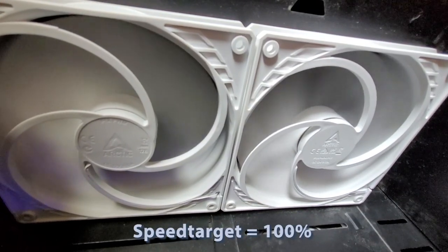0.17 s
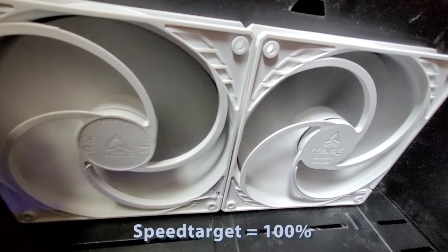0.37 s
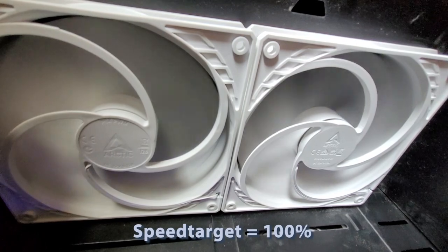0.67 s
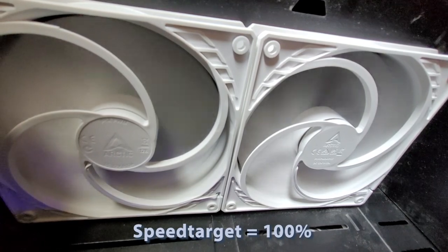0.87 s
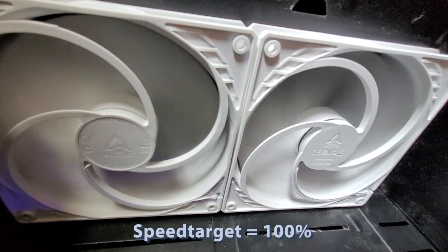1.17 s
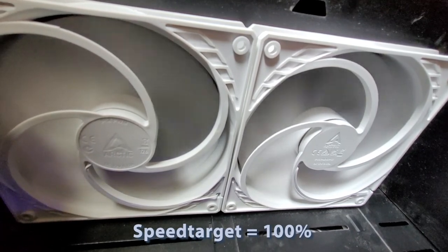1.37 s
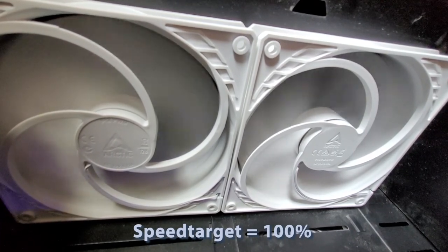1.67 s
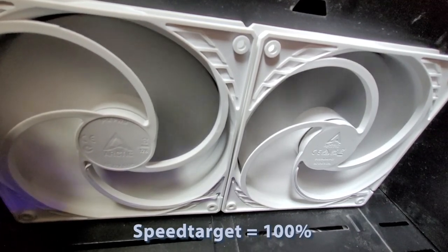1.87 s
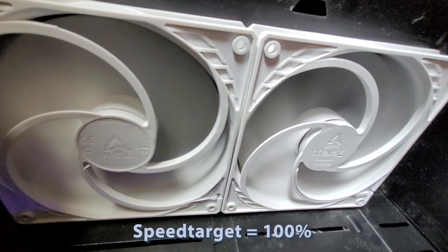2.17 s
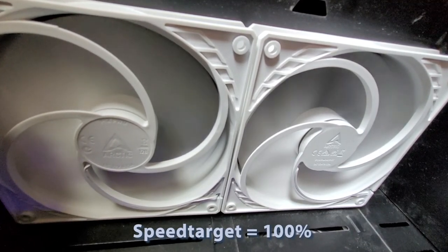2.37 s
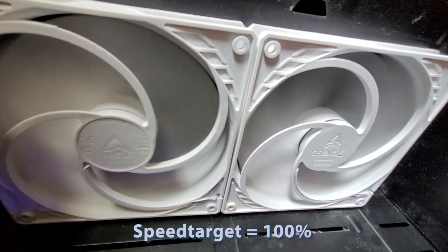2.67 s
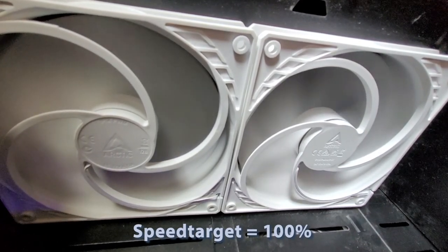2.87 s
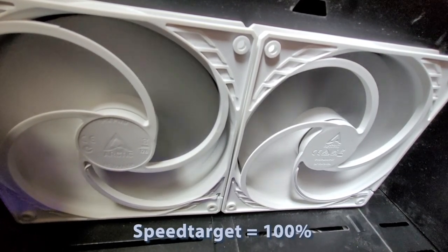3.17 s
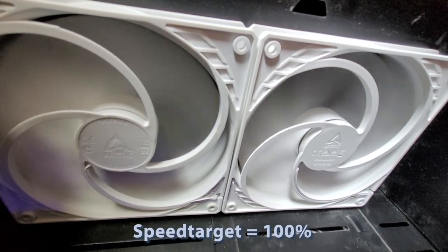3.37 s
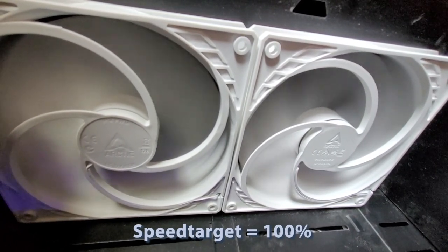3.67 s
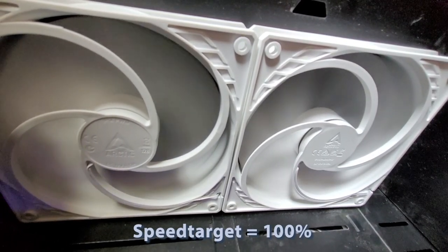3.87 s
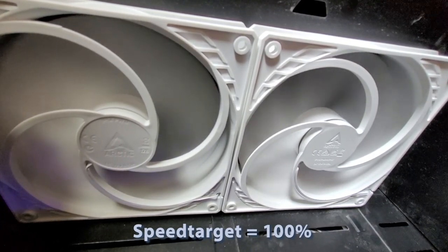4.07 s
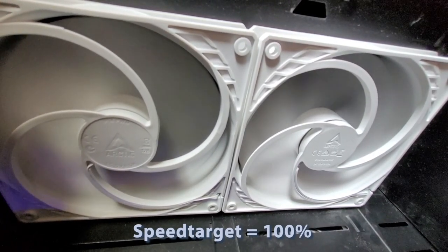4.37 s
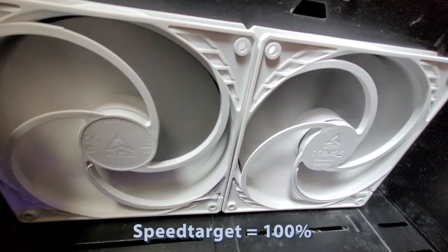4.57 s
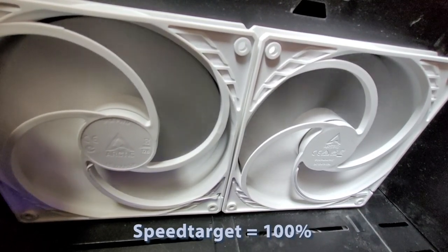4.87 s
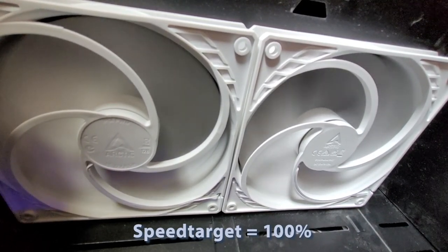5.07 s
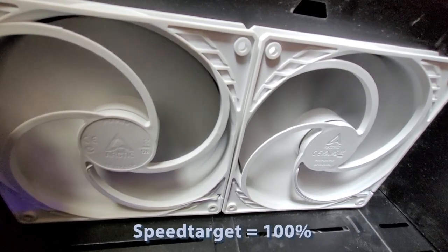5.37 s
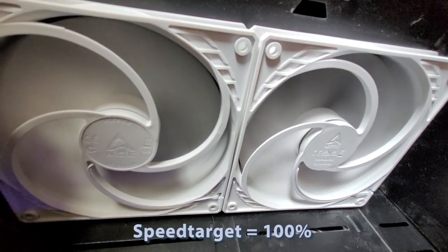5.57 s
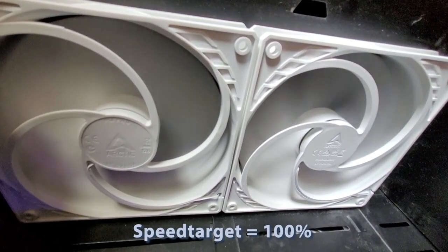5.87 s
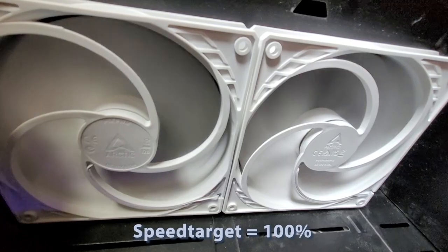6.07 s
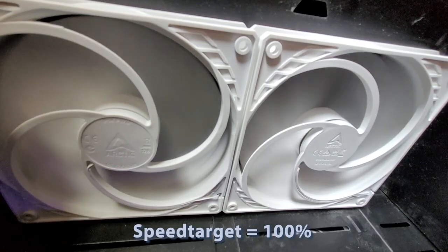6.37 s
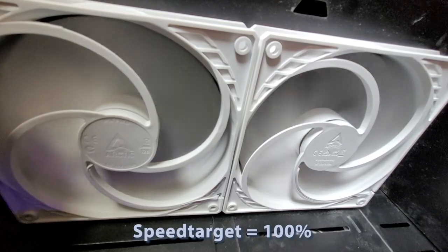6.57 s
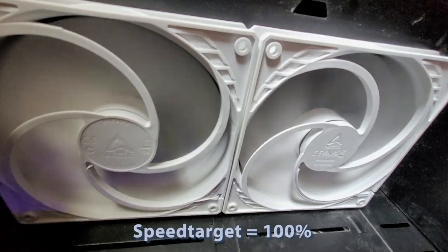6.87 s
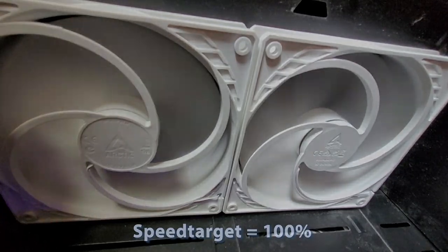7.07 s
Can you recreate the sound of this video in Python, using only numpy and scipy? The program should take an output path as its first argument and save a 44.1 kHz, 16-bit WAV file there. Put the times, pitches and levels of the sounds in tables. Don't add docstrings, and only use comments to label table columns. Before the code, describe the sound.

Two fans spin flat out very close to a stereo microphone. Low wind rumble dominates, steady and softer on the right, gusty on the left, where irregular dull thumps and flaps burst in the airflow. Beneath it runs a constant low hum with a faint higher whine and a soft, hollow rush of air ringing inside a computer case.

```python
import sys
import numpy as np
from scipy import signal
from scipy.fft import irfft
from scipy.io import wavfile
from scipy.ndimage import uniform_filter1d, minimum_filter1d

SR = 44100
rng = np.random.default_rng(int(sys.argv[2]) if len(sys.argv) > 2 else 0)


def elevation(decibels):
    levels = np.asarray(decibels, float)
    return 10 ** (levels / 20)


def master(y):
    cut = np.clip(np.atleast_2d(y).T, -1, 1)
    pcm = np.round(cut * 32767)
    wavfile.write(sys.argv[1], SR, pcm.astype(np.int16))


N = 317520
HZ = np.fft.rfftfreq(N, 1 / SR)
TIME = np.arange(N) / SR
SHAFT_A_HZ, SHAFT_B_HZ = 26.919, 27.462

# start_s, rumble_db
LEFT_GUSTS = [(0.0, -34), (0.15, -22.5), (0.45, -29), (1.0, -26.5), (1.3, -30), (1.6, -27), (2.25, -25.5),
              (2.55, -28), (2.9, -24.5), (3.2, -23.5), (3.75, -29.5), (4.6, -28), (4.8, -24.5), (5.25, -25),
              (5.8, -30), (6.15, -26), (6.9, -26), (7.2, -28)]
# centre_s, peak_db, pitch_hz, length_ms
BIG_EDDIES = [(0.168, -7, 117, 16), (0.244, -6.5, 80, 30), (0.312, -10, 90, 27), (0.856, -13.5, 83, 32),
              (1.116, -12, 86, 20), (1.504, -8, 103.6, 22), (1.674, -7, 68, 41), (1.829, -8, 131, 21),
              (2.102, -8.5, 81, 19), (2.234, -2.5, 87.5, 13), (2.421, -8.5, 124, 21), (2.785, -9, 104, 16),
              (2.83, -7.5, 95, 29), (2.989, 0.5, 87.5, 9.1), (3.037, -5, 84, 17), (3.673, -10, 109, 16),
              (4.305, -7, 86.5, 17), (4.39, -8.5, 80, 28), (4.665, -10, 79.6, 25), (4.842, -8, 86, 16),
              (4.905, -5.5, 124, 19), (5.034, -6.5, 67, 35), (5.142, -7, 72, 34), (5.267, -9, 85.4, 40),
              (5.63, -7, 84, 53), (6.095, -2.5, 91, 12), (6.176, -4.5, 87, 15.5), (6.401, -3.5, 72, 15),
              (6.682, -1.5, 108, 17.5), (7.181, -7.5, 57.6, 32)]
# centre_s, peak_db
SMALL_EDDIES = [(0.107, -13.5), (0.133, -11.5), (0.311, -8), (1.503, -15.5), (1.586, -12), (1.664, -13),
                (1.829, -9.5), (1.895, -9), (2.809, -10), (2.943, -16), (2.976, -12), (3.018, -15.5),
                (3.686, -19.5), (4.382, -13.5), (4.677, -18), (4.843, -10), (4.897, -14.5), (5.031, -13),
                (5.137, -18.5), (5.201, -21.5), (5.245, -20), (5.306, -13.5), (5.62, -13), (6.063, -19),
                (6.09, -16.5), (6.174, -13.5), (6.58, -20), (6.656, -5.5), (6.701, -15), (7.168, -18.5)]


def walk(rate_hz):
    hold = int(SR / rate_hz)
    steps = np.repeat(rng.standard_normal(N // hold + 1), hold)
    return 1.51 * uniform_filter1d(uniform_filter1d(steps, hold), hold)[:N]


def noise():
    return np.sqrt(N * SR / 4) * (rng.standard_normal(len(HZ)) + 1j * rng.standard_normal(len(HZ)))


def colour(table):
    hz, *ports_db = np.transpose(table)
    gain = elevation([np.interp(np.log(HZ + 1), np.log(hz), db) for db in ports_db])
    return gain * np.minimum(HZ / hz[0], 1) ** 2


def octave_share(centre_hz):
    return np.cos(np.pi / 2 * np.clip(np.log2((HZ + 1) / centre_hz), -1, 1))


def curves(table):
    s, *columns = np.transpose(table)
    return [np.interp(TIME, s, column) for column in columns]


def stirred(table, width_s):
    calm = np.ones(N)
    for s in np.transpose(table)[0]:
        near = slice(max(int((s - 3 * width_s) * SR), 0), int((s + 3 * width_s) * SR))
        calm[near] *= 1 - np.exp(-((TIME[near] - s) / width_s) ** 2)
    return 1 - calm


def draught(flicker_db, surge_db, tilt):
    # hz, left_db_per_hz, right_db_per_hz
    swirl_levels = [(14, -28, -30), (25, -17, -21), (46, -3, -4), (66, 0, 0), (92, -7, -5), (145, -6, -4),
                    (180, -14, -15), (250, -13, -11), (300, -19, -17), (350, -23, -23), (435, -23, -27),
                    (455, -30, -31), (700, -45, -45)]
    right_rumble_db, right_flutter_db, lee_share = -28.5, -29.5, .15
    gust_db = curves(LEFT_GUSTS)[0]
    change_db = gust_db - gust_db.mean()
    spectrum = colour(swirl_levels) * [noise(), noise()]
    spectrum /= irfft(spectrum, N).std(axis=1, keepdims=True)
    left_low_db = gust_db + surge_db[0] * stirred(BIG_EDDIES, width_s=.043)
    left_high_db = gust_db + tilt * change_db + surge_db[1] * stirred(SMALL_EDDIES, width_s=.025)
    low_db = np.array([left_low_db, right_rumble_db + lee_share * change_db])
    high_db = np.array([left_high_db, right_flutter_db + 0 * TIME])
    out = 0
    for octave in range(6):
        flicker = np.array(flicker_db)[:, None] * [walk(22), walk(26)]
        level_db = high_db if octave > 2 else low_db
        out = out + irfft(spectrum * octave_share(16 * 2 ** octave), N) * elevation(level_db + flicker)
    return out


def family(times, db, hz, ms, spread):
    chance = rng.standard_normal((len(times), 2))
    pitch_hz = hz * (1 + spread * chance[:, 0])
    length_ms = ms * np.exp(2 * spread * chance[:, 1])
    return np.transpose([times, db, pitch_hz, length_ms])


def stray(count, over_db, scatter_db):
    chance = rng.uniform(0, 1, (count, 2))
    times = (np.arange(count) + chance[:, 0]) / count * TIME[-1]
    gust_db = np.interp(times, *np.transpose(LEFT_GUSTS))
    return times, gust_db + over_db - scatter_db * chance[:, 1]


def eddies(table, glide, rise, fall, over, over_db, trim_db):
    lead_in = SR // 2
    out = np.zeros(N + SR)
    chance = rng.uniform(0, 2 * np.pi, (len(table), 3))
    t = np.arange(-SR // 10, SR // 10) / SR
    for (s, db, hz, ms), (phase, top_phase, skew) in zip(table, chance):
        u = t / (np.where(t < 0, rise, fall) * ms / 1000)
        bell = np.exp(-np.log(16) * u ** 2)
        cycles = hz * t * (1 - glide * np.clip(u, -1.5, 1.5) / 2)
        top_ratio = over * (1 + .14 * np.sin(skew))
        top = elevation(over_db) * bell * np.cos(2 * np.pi * top_ratio * cycles + top_phase)
        start = int(s * SR) + lead_in - SR // 10
        out[start:start + len(t)] += elevation(db + trim_db) * bell * (np.cos(2 * np.pi * cycles + phase) + top)
    return out[lead_in:lead_in + N]


def buffets():
    big_s, big_db = np.transpose(BIG_EDDIES)[:2]
    small_s, small_db = np.transpose(SMALL_EDDIES)
    stray_big = family(*stray(count=30, over_db=14.5, scatter_db=13.5), hz=85.5, ms=25, spread=.13)
    big = np.vstack([BIG_EDDIES, stray_big])
    wake = family(big_s + .0056, big_db - 10.5, hz=53, ms=26, spread=.11)
    stray_small = family(*stray(count=32, over_db=3, scatter_db=11), hz=235, ms=12, spread=.1)
    small = np.vstack([family(small_s, small_db, hz=233.8, ms=12.9, spread=.06), stray_small])
    tiny = family(small_s - .002, small_db - 13.5, hz=399, ms=12, spread=.058)
    out = eddies(wake, glide=.33, rise=.9, fall=1.1, over=1.5, over_db=-8, trim_db=-2.5)
    out += eddies(big, glide=.64, rise=.93, fall=1, over=1.67, over_db=-10.5, trim_db=-.76)
    out += eddies(small, glide=.29, rise=.9, fall=.67, over=1.4, over_db=-15, trim_db=1.44)
    out += eddies(tiny, glide=.17, rise=.83, fall=.92, over=1.346, over_db=-7, trim_db=-3)
    return out


def whistle():
    # centre_s, length_s, pitch_hz, width_hz, left_db, right_db
    whistle_settings = (1.82, .11, 8500, 1100, -69, -74)
    s, length_s, hz, width_hz, *ports_db = whistle_settings
    band = np.exp(-2 * ((HZ - hz) / width_hz) ** 2)
    hiss = irfft(band * [noise(), noise()], N) / np.sqrt(width_hz)
    return hiss * elevation(np.array(ports_db))[:, None] * np.exp(-2 * ((TIME - s) / length_s) ** 2)


def case(shared):
    # centre_hz, width_hz, left_db, right_db, left_lead_rad
    air_spaces = [(730, 75, -57, -50, 3.0), (850, 120, -55, -58, .4), (965, 75, -53.5, -49.5, .4),
                  (1090, 60, -57, -53.5, 1.5), (1240, 125, -51.5, -43.5, .6), (1375, 70, -59, -51, -2.6),
                  (1545, 140, -56, -52, 1.8), (1920, 150, -58, -58, .2), (2090, 170, -57, -60, .1),
                  (3050, 200, -64, -64, -2.0), (3450, 250, -68, -64, -2.5), (3950, 250, -70, -69, 2.8),
                  (4750, 200, -75, -67, 2.8), (5050, 250, -67, -69, 2.8), (6500, 500, -74, -71, 3.0),
                  (7250, 400, -82, -71, 3.0), (7850, 350, -74, -79, 3.0), (15450, 400, -90, -90, .1)]
    out, shared = 0, np.clip(shared, 0, 1)
    for hz, width_hz, left_db, right_db, lead_rad in air_spaces:
        shape = 1 / (1 + (2 * (HZ - hz) / width_hz) ** 2) / np.sqrt(np.pi / 4 * width_hz)
        right = noise()
        left = np.sqrt(shared) * np.exp(1j * lead_rad) * right + np.sqrt(1 - shared) * noise()
        out = out + shape * [elevation(left_db) * left, elevation(right_db) * right]
    return irfft(out, N)


def rush(flicker_db, throb):
    # hz, left_db_per_hz, right_db_per_hz
    rush_levels = [(450, -75, -74), (880, -78.5, -74), (1110, -74.5, -72.5), (1370, -80.5, -80),
                   (1774, -82, -75.5), (2170, -86.5, -91), (2860, -91, -92), (4100, -93, -89.5),
                   (5360, -97, -94.5), (6440, -102, -100), (8080, -102, -100), (8370, -111, -111),
                   (10400, -114, -113), (14900, -118, -118)]
    spectrum = colour(rush_levels) * [noise(), noise()]
    turn = np.sin(2 * np.pi * SHAFT_B_HZ * TIME)
    out = 0
    for octave in range(8):
        band = irfft(spectrum * octave_share(125 * 2 ** octave), N) * elevation(flicker_db * walk(16))
        out = out + band * (1 + throb * (octave > 4) * turn)
    return out


def air():
    # start_s, flow_db
    flow = [
        (0.0, -0.3),
        (1.2, -0.54),
        (1.8, 0.5),
        (3.9, -0.64),
        (4.7, 0.8),
        (5.7, -0.56),
        (6.8, -0.5),
        (7.2, -3.5),
    ]
    return (rush(flicker_db=.35, throb=.08) + case(shared=.94)) * elevation(curves(flow)[0])


def tones(shaft_hz, table, wobble_hz, swell_db, lag_s):
    turns = np.cumsum(shaft_hz + wobble_hz * walk(1.517)) / SR
    out = 0
    for k, *ports_db in table:
        port_phase = 2 * np.pi * k * shaft_hz * np.array([[lag_s], [0]])
        phase = rng.uniform(0, 2 * np.pi) + port_phase
        level = np.sqrt(2) * elevation(np.array(ports_db)[:, None] + swell_db * walk(5.9))
        out = out + level * np.sin(2 * np.pi * k * turns + phase)
    return out


def blade_tone(left_db, flicker_db):
    # start_s, right_db
    swell = [
        (0.0, -37),
        (0.6, -39.5),
        (1.0, -38.5),
        (2.4, -33),
        (3.6, -37.5),
        (4.2, -35),
        (4.9, -40.5),
        (5.8, -42),
        (6.6, -36.5),
        (7.2, -36.5),
    ]
    db = curves(swell)[0] + np.array([[left_db], [0]]) + flicker_db * walk(19)
    return np.sqrt(2) * elevation(db) * np.sin(2 * np.pi * 5 * SHAFT_A_HZ * TIME)


def fans():
    # shaft_multiple, left_db, right_db
    fan_a = [(15, -52, -61), (30, -64, -64), (36, -67, -57)]
    fan_b = [(5, -47, -44), (10, -47, -44), (13, -68, -62), (16, -56, -61), (20, -57, -65), (25, -68, -64),
             (54, -75, -57.5), (58, -70, -59), (62, -70, -66)]
    hum = tones(SHAFT_A_HZ, fan_a, wobble_hz=.012, swell_db=2.6, lag_s=-.0003)
    hum += tones(SHAFT_B_HZ, fan_b, wobble_hz=.01, swell_db=1.8, lag_s=-.0003)
    return hum + blade_tone(left_db=3.5, flicker_db=2.2)


def scene():
    wind = draught(flicker_db=(2.2, 1.5), surge_db=(4.5, 5), tilt=.29)
    left_only = np.array([[1], [0]])
    return wind + buffets() * left_only + whistle() + air() + fans()


def low_pass(x):
    return signal.sosfilt(signal.butter(12, 15750, fs=SR, output="sos"), x)


def record(dry):
    x = signal.sosfilt(signal.butter(2, 22, "high", fs=SR, output="sos"), dry)
    span = SR // 50
    room = np.minimum(1, .95 / np.abs(x).max(axis=0))
    gain = uniform_filter1d(minimum_filter1d(room, 2 * span), span)
    return low_pass(x * gain)


dry = scene()
out = record(dry)
master(out)
```